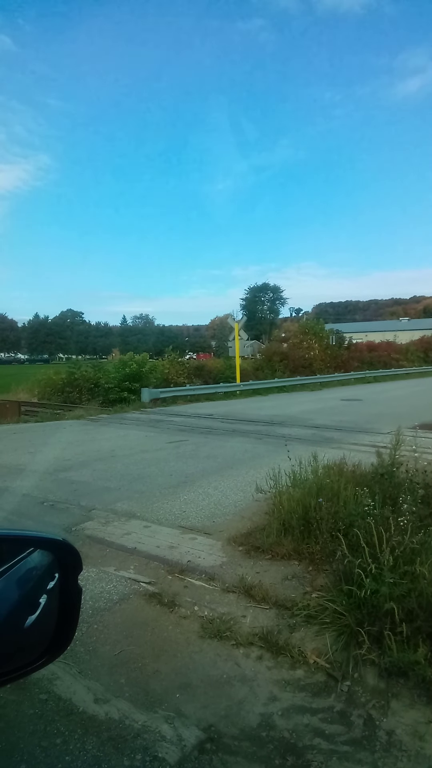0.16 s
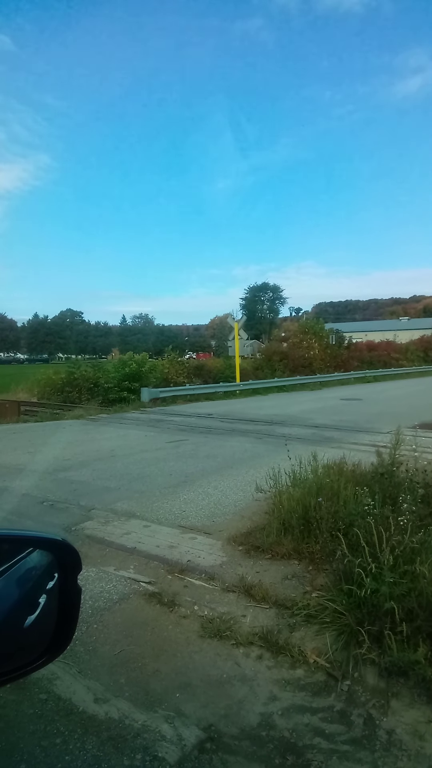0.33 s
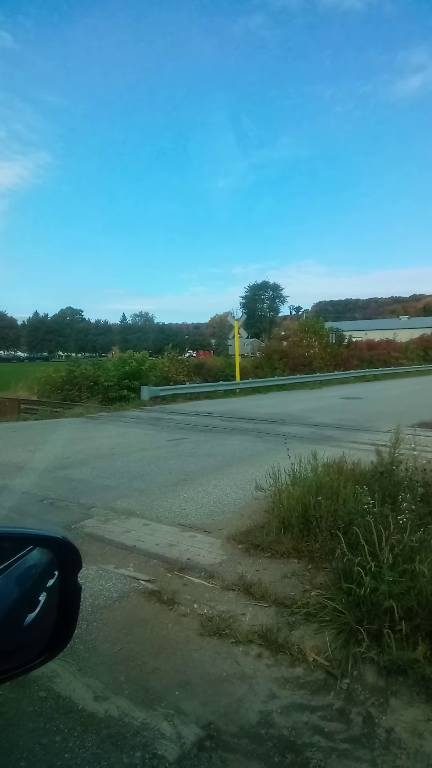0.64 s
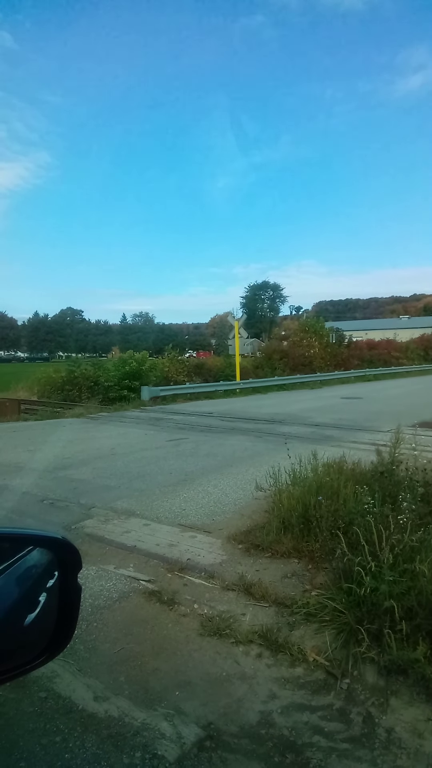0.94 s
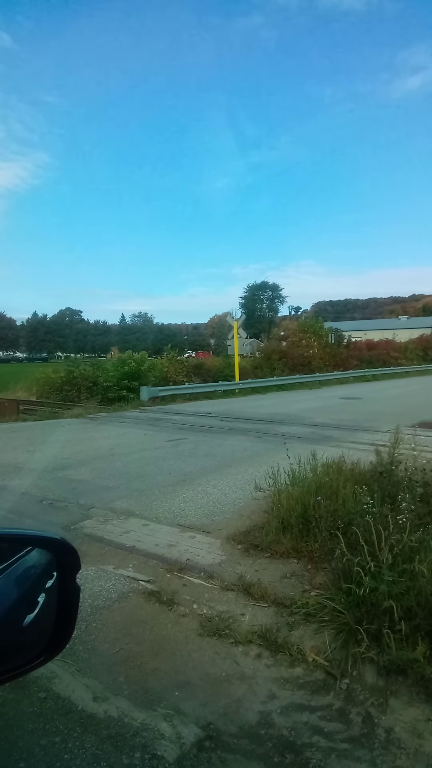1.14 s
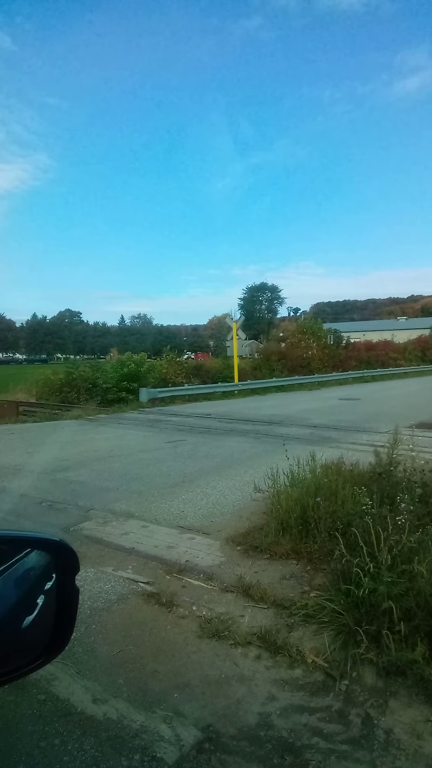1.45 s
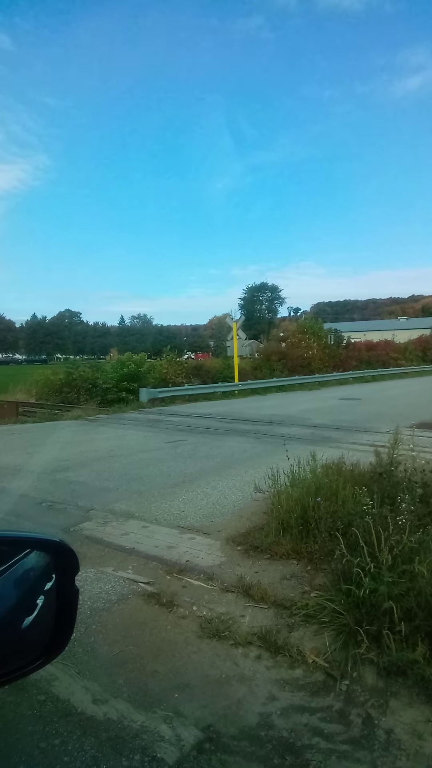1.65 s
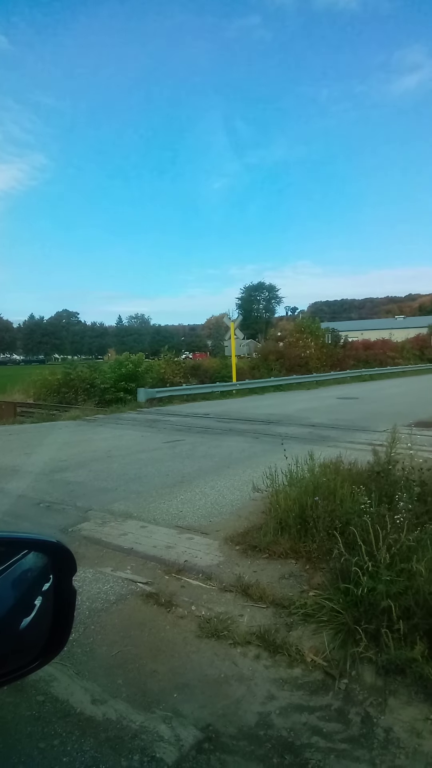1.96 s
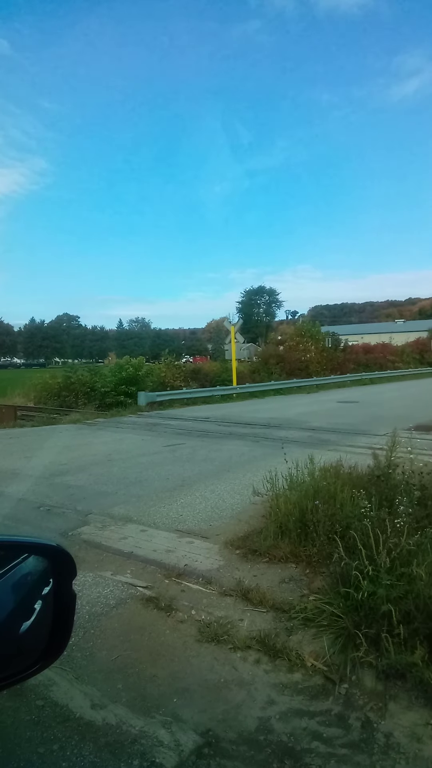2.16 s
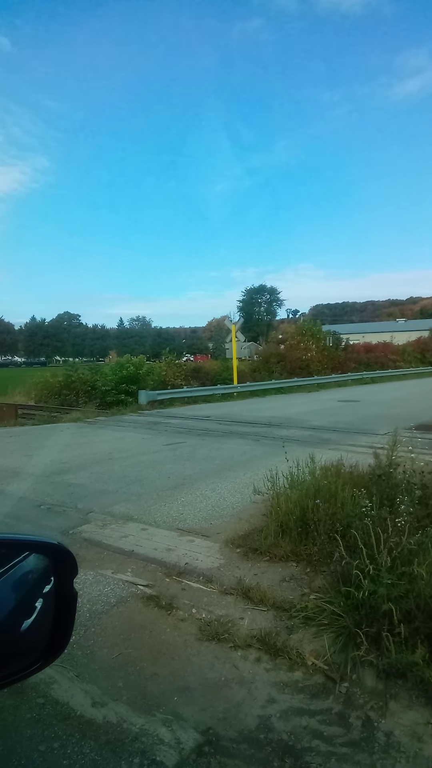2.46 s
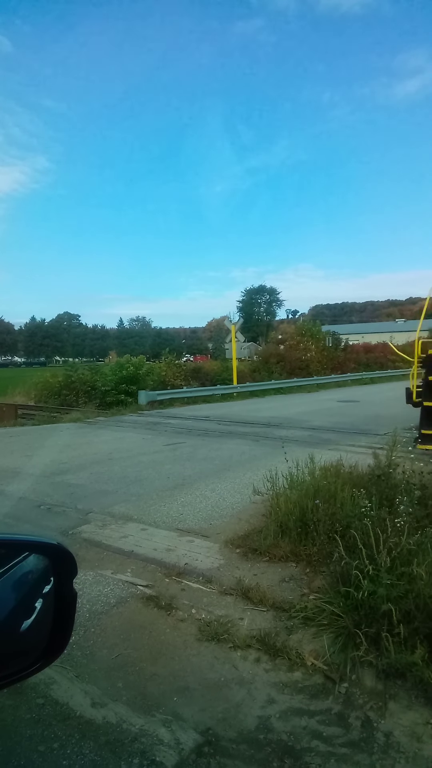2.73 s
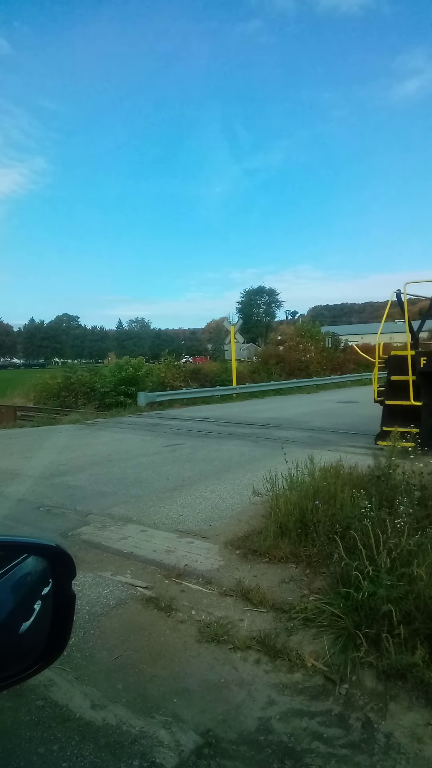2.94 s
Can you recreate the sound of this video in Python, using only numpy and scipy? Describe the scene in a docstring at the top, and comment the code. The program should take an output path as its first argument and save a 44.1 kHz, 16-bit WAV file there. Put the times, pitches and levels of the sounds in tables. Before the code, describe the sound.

A locomotive horn gives one long, loud, steady chord after a tiny dry snap, with air rushing; near its end small hard ticks rattle, then it cuts off and diesel rumble and hissing air rise, outdoors.

```python
"""Locomotive horn blast

A locomotive blows one long blast: two strong chimes and a faint third, stacks of sine partials with breath.
Shaped noise makes the diesel rumble, machinery, hissing air, venting valve and rush through the bells.
The rumble sinks under the blast and ends louder; a noise tail gives the horn a dull echo from the land around.
Short decaying sines make a buzzing snap, a later rattle of hard ticks and thin tones fading at the start.
"""
import sys
import numpy as np
from scipy import signal
from scipy.fft import rfft, irfft
from scipy.io import wavfile
from scipy.ndimage import uniform_filter1d

SR = 44100
rng = np.random.default_rng(int(sys.argv[2]) if len(sys.argv) > 2 else 0)


def file_out(sig):
    """Save sig as 16-bit WAV at sys.argv[1]."""
    # one column per channel
    cols = np.atleast_2d(sig).T
    # limit, then scale
    lim = np.clip(cols, -1, 1)
    pcm = np.round(lim * 32767).astype(np.int16)
    wavfile.write(sys.argv[1], SR, pcm)


def boost(x):
    """Linear amplitude factor 10**(x/20) for a level x in decibels (scalar or array-like)."""
    u = np.asarray(x, float) / 20
    return 10 ** u


N = 136710
TIME_S = np.arange(N) / SR

# High chime, rms: t/s, levels of partials 1 to 6/dB, bright register/dB, top register/dB
HIGH_CHIME_LEVELS = [(0.2, -53, -70, -72, -76, -72, -70, -76, -71.5),
                     (0.23, -29.5, -46, -69, -72, -70, -68, -69.5, -77),
                     (0.26, -23, -23.5, -37.5, -41, -54.5, -53, -61, -86),
                     (0.33, -21, -28, -33.5, -35, -56, -53.5, -56, -66.5),
                     (0.5, -21.5, -30.5, -34, -35.5, -54, -46, -53, -62.5),
                     (0.75, -18.5, -27, -34.5, -38, -44, -47.5, -55, -61.5),
                     (1.0, -19.5, -27.5, -37.5, -37.5, -50.5, -53.5, -48.5, -59),
                     (1.2, -20, -30, -35.5, -39.5, -51, -47, -51, -56.5),
                     (1.4, -19.5, -31.5, -38.5, -43, -50, -51, -46.5, -58.5),
                     (1.52, -18, -29, -46, -37, -51, -53, -46, -60),
                     (1.7, -17.5, -34.5, -38, -35, -51, -47.5, -49, -61),
                     (1.95, -16, -30.5, -37, -36, -43, -54, -51, -69.5),
                     (2.15, -17, -30.5, -34.5, -38, -46.5, -51.5, -57, -70.5),
                     (2.3, -17, -27.5, -40, -44, -46.5, -56, -60, -68),
                     (2.42, -17, -28.5, -53.5, -50.5, -47, -61, -57, -71.5),
                     (2.6, -15, -30.5, -44, -42.5, -48, -57, -60, -75),
                     (2.68, -18, -42, -39.5, -51, -52.5, -60, -69, -75),
                     (2.73, -19.5, -44, -46, -58, -66, -68, -75, -86),
                     (2.77, -25.5, -51, -65, -70, -74, -76, -82, -88),
                     (2.86, -38, -55, -73, -78, -82, -82, -90, -91.5)]


def curve(rows, col):
    """One table column interpolated over the scene's time."""
    rows = np.array(rows, float)
    return np.interp(TIME_S, rows[:, 0], rows[:, col])


def walk(rate_per_s):
    """Random levels held 1 / rate_per_s and smoothed twice; spread near 1."""
    hold = int(SR / rate_per_s)
    steps = np.repeat(rng.standard_normal(N // hold + 1), hold)
    return 1.3 * uniform_filter1d(uniform_filter1d(steps, hold), hold)[:N]


def noise(colour):
    """Noise of rms 1, its spectrum interpolated over log frequency; silent outside the table."""
    hz, db = np.array(colour, float).T
    f_hz = np.fft.rfftfreq(N, 1 / SR) + 1
    shape_db = np.interp(np.log(f_hz), np.log(hz), db, left=-np.inf, right=-np.inf)
    x = irfft(rfft(rng.standard_normal(N)) * boost(shape_db), N)
    return x / x.std()


def band(colour, level_rows, flicker_per_s):
    """Coloured noise following a level curve, with a small random flicker."""
    flicker_db = 1.3
    return noise(colour) * boost(curve(level_rows, 1) + flicker_db * walk(flicker_per_s))


def ring(modes, count):
    """Exponentially decaying sines with chance phases."""
    t = np.arange(count) / SR
    out = np.zeros(count)
    for hz, db, t60_s in modes:
        out += boost(db) * np.sin(2 * np.pi * (hz * t + rng.random())) * 1000 ** (-t / t60_s)
    return out


def clicks():
    """Single-sample clicks of chance size on a regular grid, treble only; most too weak to hear."""
    first_s, last_s, grid_s = .2437, 2.52, .02
    floor_db, scatter_db = -65, 7  # before the high-pass
    at = (np.arange(first_s, last_s, grid_s) * SR).astype(int)
    x = np.zeros(N)
    x[at] = boost(floor_db + scatter_db * np.minimum(rng.exponential(size=len(at)), 3))
    return signal.sosfilt(signal.butter(N=4, Wn=7500, btype="high", fs=SR, output="sos"), x)


def fading_tones():
    """Faint thin sines that die away from the start."""
    # Tones: f/Hz, peak level at start/dB, t60/s
    thin_tones = [(1960, -58.5, 0.99), (3180, -64, .5), (4740, -61, .6)]
    return ring(thin_tones, count=N)


def rumble():
    """Diesel rumble: low noise throbbing slightly at an unsteady firing rate."""
    # Rumble spectrum: f/Hz, relative density/dB
    rumble_colour = [(20, -24.5), (40, -7.5), (70, -13.5), (85, 5.5), (120, 2.5), (152, 6), (180, -7),
                     (215, 2.5), (260, -7), (330, -3.5), (400, -17.5), (600, -47), (900, -62)]
    # Rumble rms: t/s, level/dB
    rumble_level = [(0, -32.5), (.2, -37), (.3, -41), (.6, -41), (1.3, -38.5), (2.0, -40.5), (2.68, -37.5),
                    (2.77, -27), (3.1, -25.5)]
    firing_hz, firing_jitter, throb_depth = 25.5, .05, .15
    beat = np.sin(2 * np.pi * np.cumsum(firing_hz * (1 + firing_jitter * walk(4.5))) / SR)
    return band(rumble_colour, rumble_level, 9) * (1 + throb_depth * beat)


def machinery():
    """Mid drone and a higher whirr, both bands of noise."""
    # Drone spectrum: f/Hz, relative density/dB
    drone_colour = [(250, -34), (400, -2.5), (600, -8), (900, -16), (1150, -19), (1400, -22.5), (1800, -43)]
    # Drone rms: t/s, level/dB
    drone_level = [(0, -50.5), (.2, -51), (.3, -49.5), (1.5, -51), (2.6, -54.5), (2.8, -45.5), (3.1, -46.5)]
    # Whirr spectrum: f/Hz, relative density/dB
    whirr_colour = [(1200, -32.5), (1500, -7), (1800, -3.5), (2150, 0.5), (2550, -11), (2850, -17.5),
                    (3300, -37)]
    # Whirr rms: t/s, level/dB
    whirr_level = [(0, -64), (.2, -60.5), (.35, -53.5), (1.5, -54), (2.0, -67), (2.68, -59.5), (2.8, -49.5),
                   (3.1, -54.5)]
    return band(drone_colour, drone_level, 25) + band(whirr_colour, whirr_level, 25)


def valve_air():
    """Air turbulence as noise: hiss at the valve, and a higher band vented as the valve shuts."""
    # Hiss spectrum: f/Hz, relative density/dB
    hiss_colour = [(2500, -38.5), (2900, -8.5), (3400, 1.5), (4200, 1.5), (4800, -1), (5400, -0.5),
                   (6000, -4.5), (6700, -14), (7300, -26), (8200, -44.5), (9500, -60)]
    # Hiss rms: t/s, level/dB
    hiss_level = [(0, -68), (.18, -60), (.3, -54), (.6, -53), (1.5, -56.5), (2.0, -59), (2.601, -62),
                  (2.7, -58), (2.8, -50), (2.95, -55), (3.1, -57)]
    # Vent spectrum: f/Hz, relative density/dB
    vent_colour = [(4800, -29.5), (5400, -3), (6000, 5.5), (6500, -8), (6800, -7.5), (7300, -21.5),
                   (8500, -31), (11000, -30), (12500, -39), (16000, -35)]
    # Vent rms: t/s, level/dB
    vent_level = [(2.55, -83), (2.68, -64), (2.8, -53), (2.95, -63)]
    return band(hiss_colour, hiss_level, 25) + band(vent_colour, vent_level, 25)


def snap():
    """Dry buzzing snap: a burst of alike cracks, each a short ring with a soft onset."""
    # Cracks: t/s, gain/dB
    crack_times = [(.10658, -43), (.1082, -33), (.10982, -23), (.11144, -24.5), (.11306, -35), (.1163, -37)]
    # Crack modes: f/Hz, gain/dB, t60/s
    crack_modes = [(2000, -4, .003), (3350, 0, .0035), (5400, -20, .004)]
    rise_s, count = .0004, 2000
    t = np.arange(count) / SR
    crack = np.zeros(count)
    for k, (hz, db, t60_s) in enumerate(crack_modes):
        crack += (-1) ** k * boost(db) * np.sin(2 * np.pi * hz * t) * 1000 ** (-t / t60_s)
    crack *= np.sin(np.pi / 2 * np.clip(t / rise_s, 0, 1)) ** 2
    out = np.zeros(N)
    for s, db in crack_times:
        i = int(s * SR)
        out[i:i + count] += boost(db) * crack
    return out


def ticks():
    """Rattle of small hard things: each tick excites a lower and an upper group of modes."""
    # Ticks: t/s, lower ring gain/dB, upper ring gain/dB
    tick_times = [(2.243, -74, -44), (2.2746, -40.5, -36), (2.282, -59, -42), (2.292, -61, -44),
                  (2.2965, -58.5, -45), (2.313, -32.5, -45), (2.3518, -27.5, -34.5), (2.359, -45, -47.5),
                  (2.3705, -58, -42)]
    # Lower ring modes: f/Hz, gain/dB, t60/s
    lower_modes = [(3770, 4, 0.01), (4100, 2, 0.01), (4500, 0, 0.0074)]
    # Upper ring modes: f/Hz, gain/dB, t60/s
    upper_modes = [(6380, 1.5, 0.013), (6800, -6, 0.011), (7200, -9, 0.008), (5696, -2.5, 0.0086),
                   (8600, -24, 0.0039)]
    rise_s, count = .0008, 2000
    rise = np.clip(np.arange(count) / SR / rise_s, 0, 1)
    out = np.zeros(N)
    for s, lower_db, upper_db in tick_times:
        i = int(s * SR)
        lower = boost(lower_db) * ring(lower_modes, count)
        upper = boost(upper_db) * ring(upper_modes, count)
        out[i:i + count] += rise * (lower + upper)
    return out


def bell_rush():
    """Air rushing through the bells: noise that follows the high chime's first partial."""
    # Rush spectrum: f/Hz, relative density/dB
    rush_colour = [(350, -19), (450, -4), (900, 0.5), (1400, -7.5), (2400, -13), (3000, -13.5),
                   (3500, -37.5)]
    under_chime_db = -32.5
    return noise(rush_colour) * boost(curve(HIGH_CHIME_LEVELS, 1) + under_chime_db)


def chime(rows, pitch, upper_db):
    """A diaphragm beating on its seat: a stack of partials, each with a skirt of breath noise."""
    onset_s, attack_s, fade_out_s = .22, .04, .02
    pitch_jitter = .001  # share of pitch
    wander_db, wander_per_s = 2, 6.26  # drift of upper partials in the moving air
    breath_db, breath_per_s = -33, 35.95  # for partial 1; amplitude grows with partial number

    steady_hz, sharp_hz, settle_s, bend_from_s, bend_to_s, bend_hz = pitch
    settling = np.exp(-np.clip(TIME_S - onset_s, 0, None) / settle_s)
    bend = np.clip((TIME_S - bend_from_s) / (bend_to_s - bend_from_s), 0, 1)
    hz = steady_hz + sharp_hz * settling + bend_hz * bend
    turns = np.cumsum(hz * (1 + pitch_jitter * walk(24.94))) / SR

    levels = [curve(rows, k) for k in range(1, min(len(rows[0]), 7))]
    for r, register in enumerate(upper_db):
        for db in register:
            levels.append(curve(HIGH_CHIME_LEVELS, 6 + r) + db + wander_db * walk(wander_per_s))

    out = np.zeros(N)
    for number, db in enumerate(levels, start=1):
        breath = 1 + boost(breath_db) * number * walk(breath_per_s)
        out += boost(db) * breath * np.sin(2 * np.pi * (number * turns + rng.random()))
    attack = (TIME_S - rows[0][0]) / attack_s
    release = (rows[-1][0] - TIME_S) / fade_out_s
    gate = np.clip(np.minimum(attack, release), 0, 1)
    return np.sqrt(2) * out * gate  # rms to peak


def echo(x):
    """Dull echo from the land around: convolution with a decaying band of noise."""
    level_db, t60_s, delay_s, low_hz, top_hz = -17, 1.5, .04, 450, 1500
    t = np.arange(SR) / SR
    b, a = signal.butter(N=1, Wn=(low_hz, top_hz), btype="band", fs=SR)
    tail = signal.lfilter(b, a, rng.standard_normal(SR)) * 1000 ** (-t / t60_s) * (t > delay_s)
    tail = tail / np.abs(rfft(tail))[500:1300].mean()  # mean gain 1 over 500-1300 Hz
    return boost(level_db) * signal.fftconvolve(x, tail)[:N]


def horn():
    """Three chimes blown together, the rush of air through their bells, and the echo of both."""
    # Low chime, rms: t/s, levels of partials 1 to 4/dB
    low_levels = [(0.2, -44, -66, -70, -77.5), (0.225, -23, -42, -57, -68.5), (0.25, -25, -31, -43, -52.5),
                  (0.33, -21.5, -34.5, -30.5, -51), (0.5, -22.5, -31.5, -32, -55),
                  (0.62, -22.5, -29.5, -32, -47), (0.75, -23, -27, -38, -61),
                  (0.95, -23.5, -31.5, -32, -55.5), (1.07, -21.5, -31, -38.5, -62.5),
                  (1.2, -24, -27.5, -36, -50.5), (1.5, -25, -28.5, -39.5, -51),
                  (1.68, -22, -28.5, -35, -57), (2.0, -20, -29, -53, -53), (2.1, -21, -29, -48.5, -60.5),
                  (2.35, -20.5, -29, -41, -56), (2.6, -21, -32.5, -40, -61), (2.7, -21.5, -38, -41, -62),
                  (2.74, -31, -40, -44, -72), (2.8, -46, -52.5, -45, -80)]
    # Faint chime, rms: t/s, level/dB
    faint_levels = [(.2, -80), (.25, -46), (.5, -46.5), (.9, -42), (1.5, -40.5), (2.0, -45.5), (2.3, -44),
                    (2.7, -53), (2.8, -52)]
    # Pitch laws: steady f/Hz, sharp at onset/Hz, settling/s, bend from t/s, bend to t/s, bend/Hz
    low_pitch = (265.1, 9, .06, 2.66, 2.75, 5)
    high_pitch = (320.7, 10, .05, 2.64, 2.76, 7)
    faint_pitch = (362, 3, .1, 1.4, 2.7, -8)
    # Upper partials in order, one row per register: level over the high chime's last three columns/dB
    low_upper_db = [
        [0, -10],
        [-5, -7, -19, -18, -17],
        [-15, -19.5, -6.5, -3.5, -7.5, -4.5, -8],
    ]
    high_upper_db = [
        [],
        [4, 2, -5.5, -7.5],
        [0.5, -1.5, 3.5, -1, -3, -3, -13, -13, -15, -15.5, -16, -19.5, -26.5, -27, -32, -35],
    ]
    low = chime(low_levels, low_pitch, low_upper_db)
    high = chime(HIGH_CHIME_LEVELS, high_pitch, high_upper_db)
    faint = chime(faint_levels, faint_pitch, [])
    direct = low + high + faint + bell_rush()
    return direct + echo(direct)


def scene():
    """All sources at one microphone."""
    engine = rumble() + machinery() + valve_air()
    return (fading_tones() + engine + snap() + ticks() + horn())[None]


def roll_off(x):
    """The treble ends steeply here."""
    return signal.sosfilt(signal.butter(12, 15830, fs=SR, output="sos"), x)


def record(dry):
    """The capsule bends the wave, adding sum tones; faint hiss and clicks join, then a 60 Hz high-pass."""
    bend = 0.1  # share of squared signal
    hiss_db = -84.5  # rms before the high-pass
    x = dry + bend * dry ** 2 + boost(hiss_db) * rng.standard_normal(dry.shape) + clicks()
    x = signal.sosfilt(signal.butter(N=1, Wn=60, btype="high", fs=SR, output="sos"), x)
    return roll_off(x)


dry = scene()
out = record(dry)
file_out(out)
```